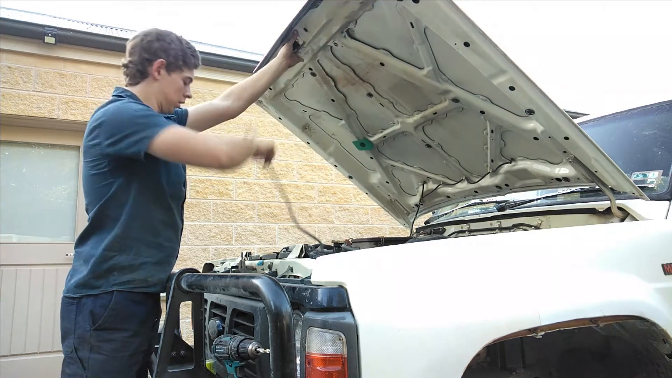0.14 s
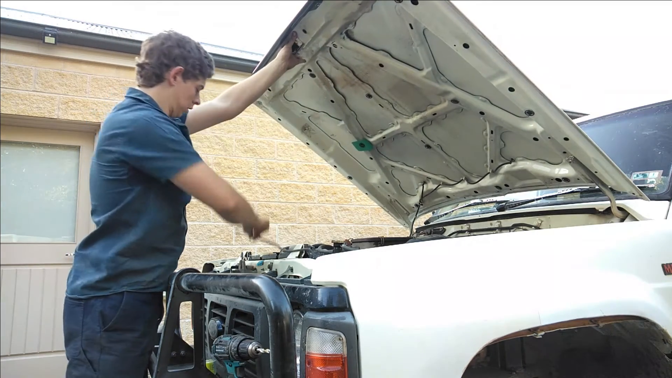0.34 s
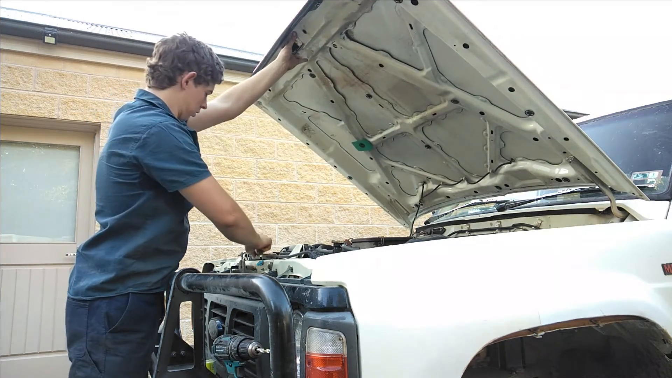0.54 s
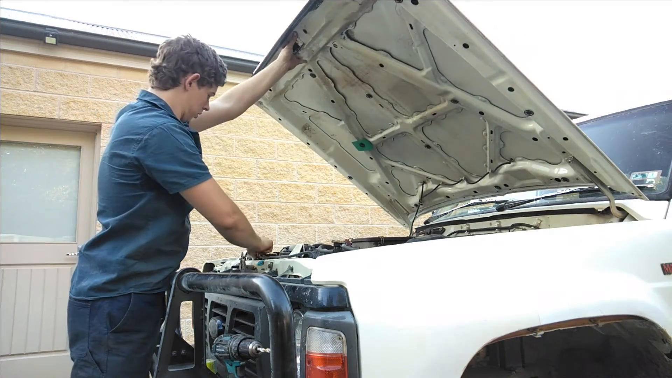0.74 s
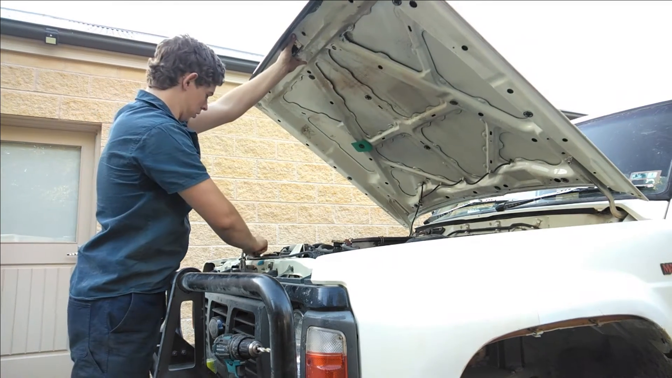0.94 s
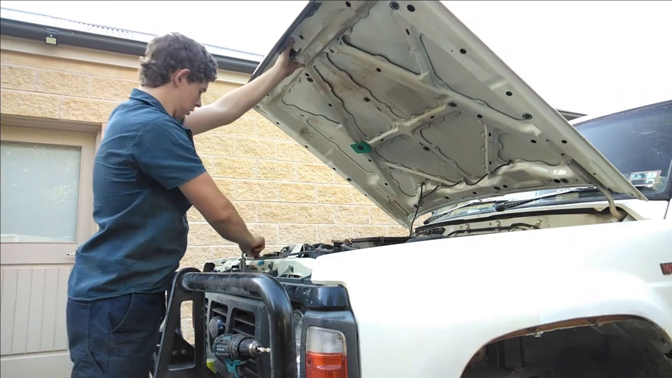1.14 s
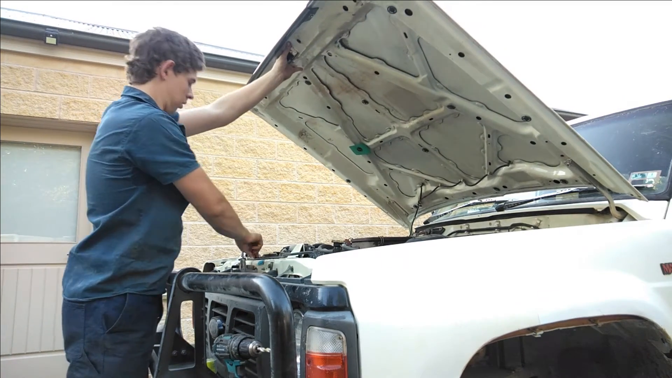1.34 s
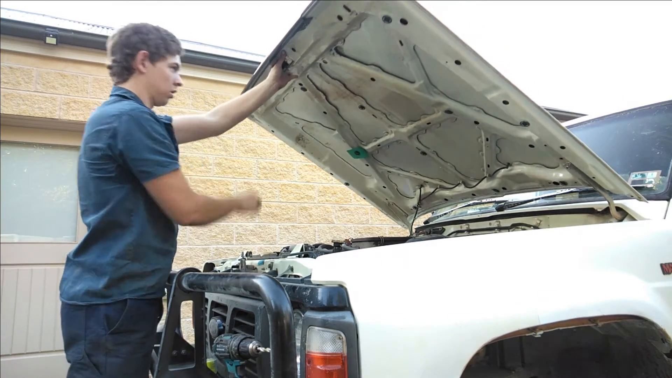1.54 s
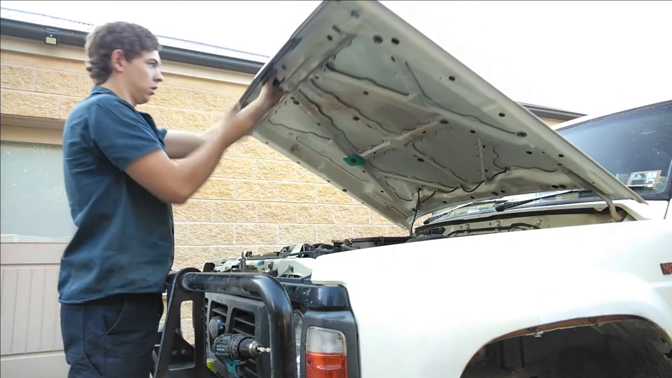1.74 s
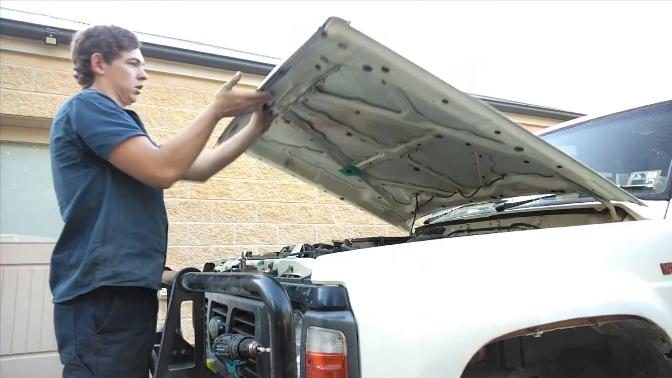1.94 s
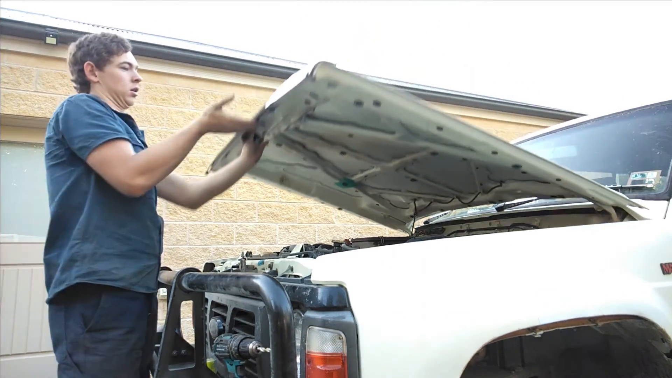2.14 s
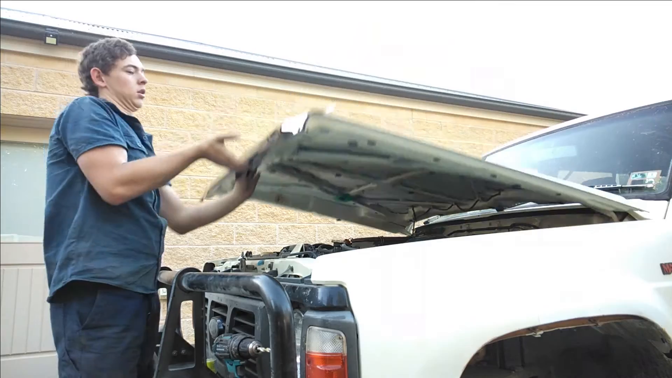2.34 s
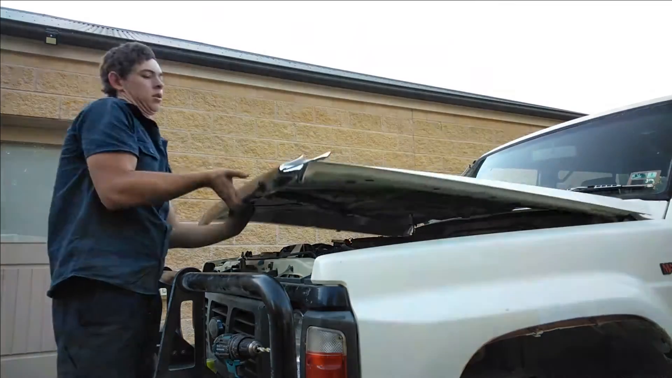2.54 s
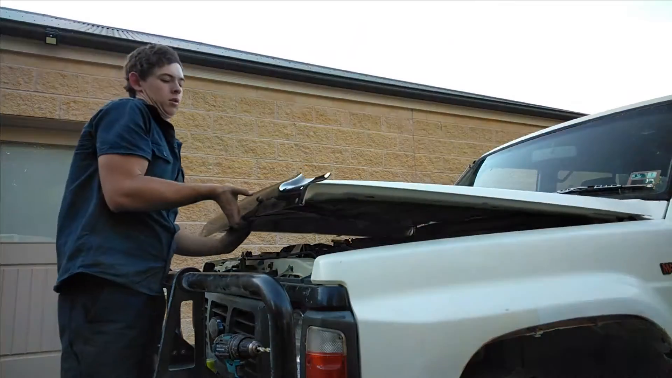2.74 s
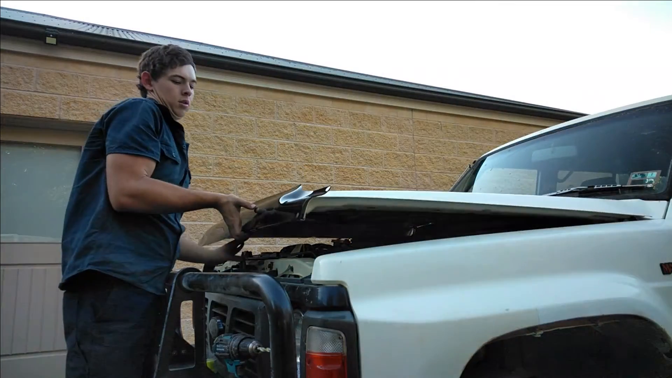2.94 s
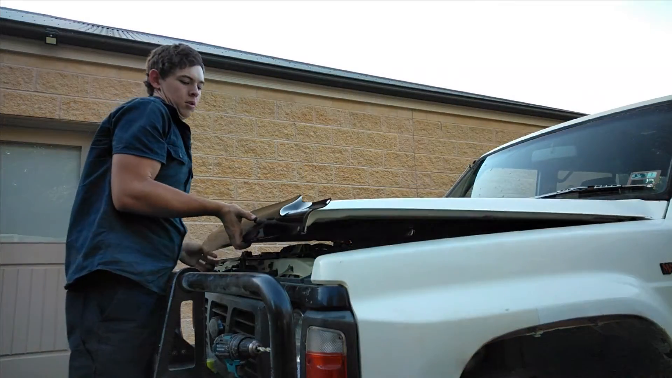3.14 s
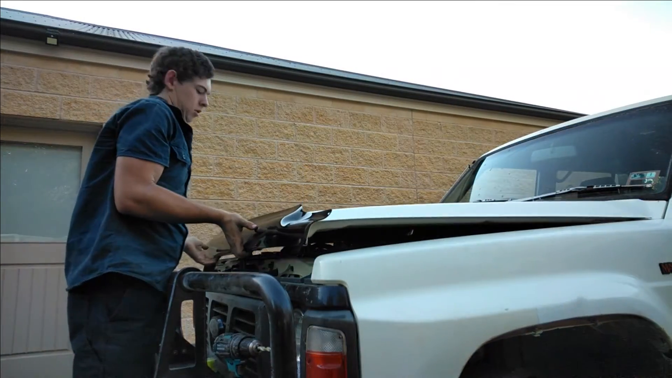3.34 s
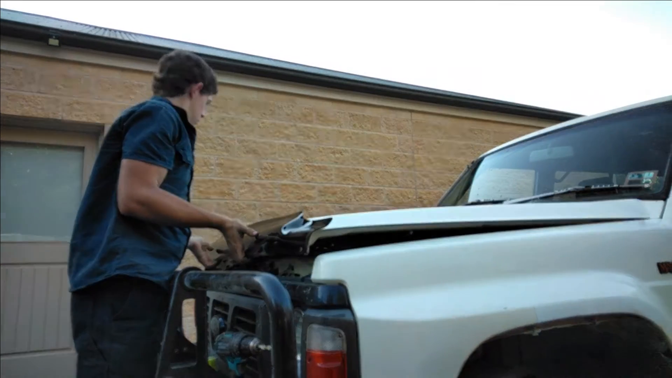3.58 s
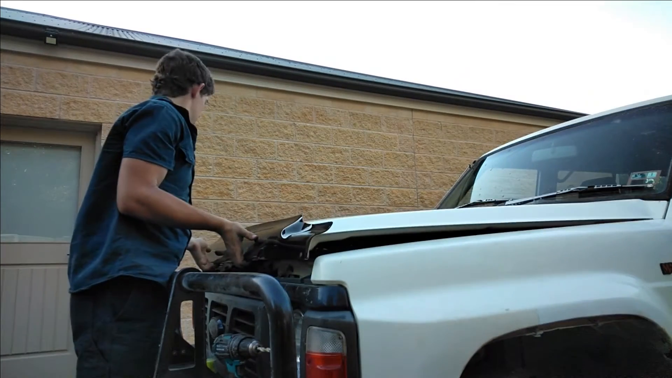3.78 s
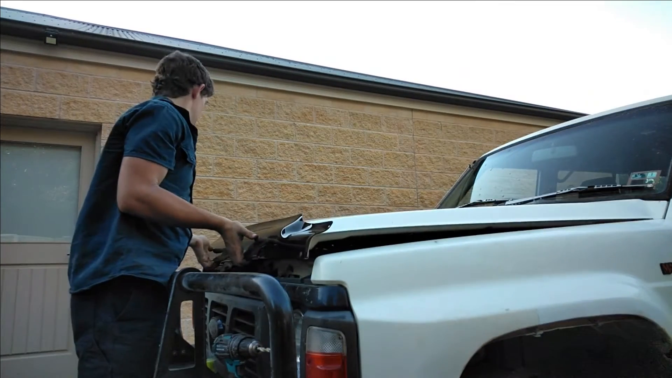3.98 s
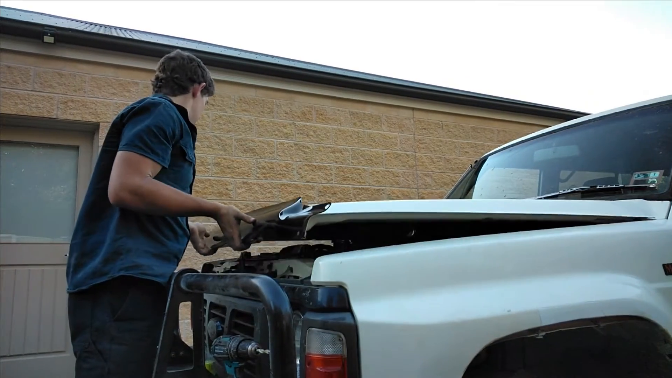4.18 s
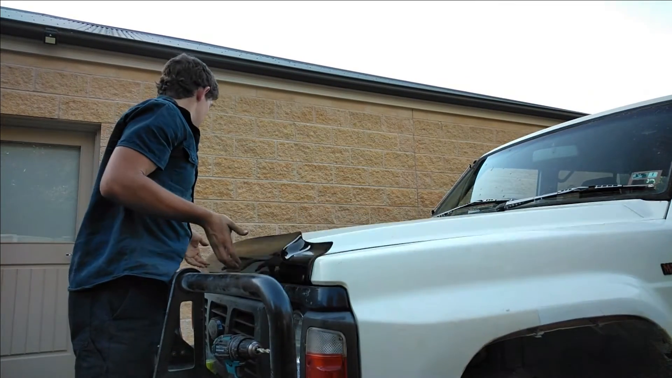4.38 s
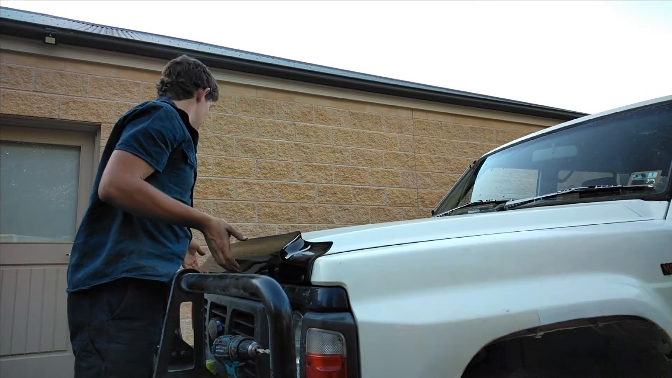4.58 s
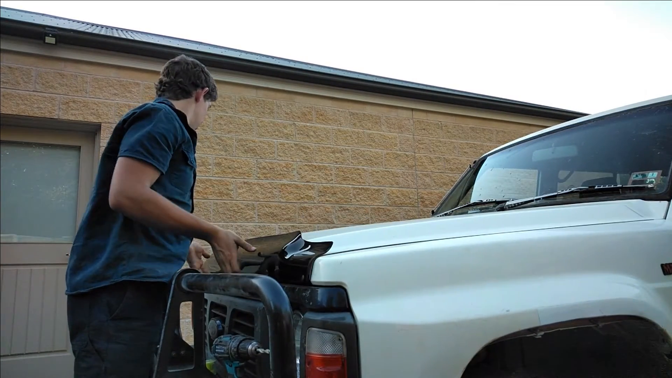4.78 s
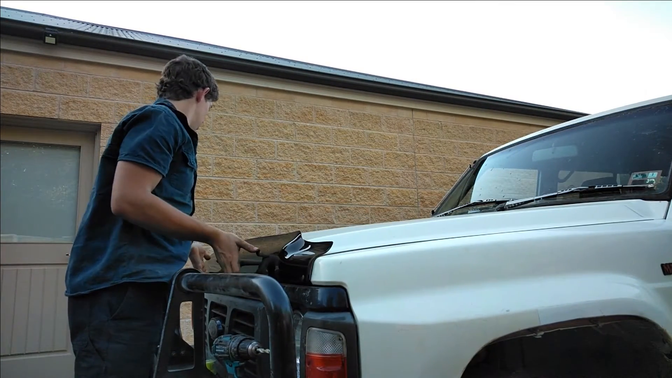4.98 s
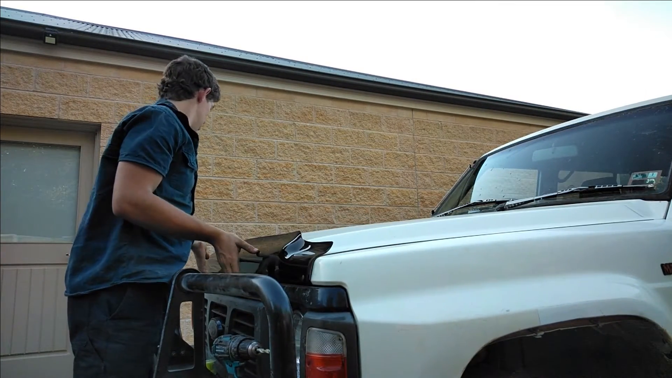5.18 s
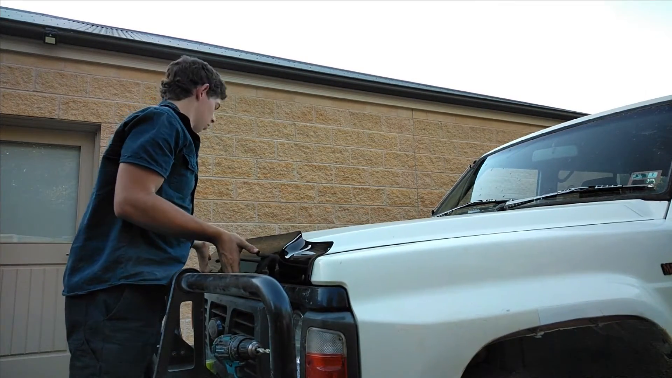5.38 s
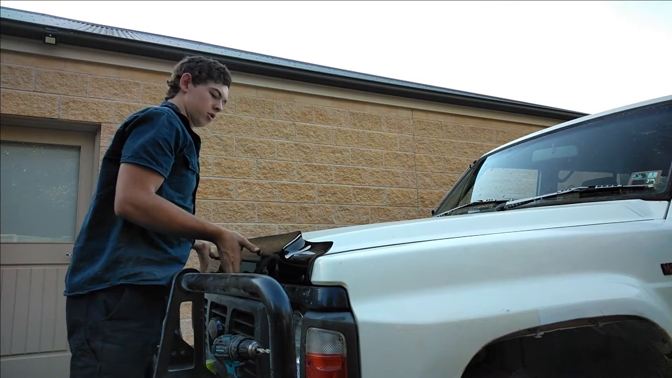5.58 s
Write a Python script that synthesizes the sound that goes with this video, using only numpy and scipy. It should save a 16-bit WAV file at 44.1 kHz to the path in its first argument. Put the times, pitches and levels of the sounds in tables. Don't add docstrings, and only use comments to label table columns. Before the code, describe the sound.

Metal rod clacks into place, a car bonnet knocks on its catch while birds chirp faintly, then a violent steel slam and fading creaks.

```python
import sys
import numpy as np
from scipy import signal
from scipy.io import wavfile
from scipy.ndimage import uniform_filter1d

SR = 44100
rng = np.random.default_rng(int(sys.argv[2]) if len(sys.argv) > 2 else 0)


def store_pcm(level_fs):
    pcm = np.round(np.clip(level_fs, -1, 1) * 32767).astype(np.int16)
    wavfile.write(sys.argv[1], SR, np.atleast_2d(pcm).T)


def volts(x):
    e = np.asarray(x, float) / 20
    return 10 ** e


N = 247401


def column(table, hz, index):
    table = np.array(table)
    return np.interp(np.log(hz), np.log(table[:, 0]), table[:, index])


def rms_one(x):
    return x / np.sqrt(np.mean(x ** 2) + 1e-20)


def drift(rate_hz):
    knots = rng.standard_normal(400)
    return np.interp(np.arange(N) / SR * rate_hz, np.arange(400), knots)


def third_octaves():
    edges_hz = 22 * 2 ** (np.arange(30) / 3)
    for low, high in zip(edges_hz, edges_hz[1:]):
        yield np.sqrt(low * high), signal.butter(2, [low, high], "band", fs=SR, output="sos")


def resonance(x, hz, width_hz):
    r = np.exp(-np.pi * width_hz / SR)
    poles = [1, -2 * r * np.cos(2 * np.pi * hz / SR), r * r]
    return signal.lfilter([(1 - r * r) / 2, 0, (r * r - 1) / 2], poles, x)


def clicks(times_s, sizes):
    train = np.full(N, 1e-18)
    at = np.minimum((np.asarray(times_s) * SR).astype(int), N - 1)
    np.add.at(train, at, sizes)
    return train


def fade(x, t60_s):
    return signal.lfilter([1], [1, -volts(-60 / (t60_s * SR))], x)


def ring(x, hz, t60_s):
    r = volts(-60 / (t60_s * SR))
    w = 2 * np.pi * hz / SR
    return signal.lfilter([0, np.sin(w)], [1, -2 * r * np.cos(w), r * r], x)


def heard(times_s):
    ring_out_s = 1.3
    return slice(int(min(times_s) * SR), int((max(times_s) + ring_out_s) * SR))


def struck(modes, times_s, levels_db):
    chance = rng.uniform(-1, 1, (len(times_s), len(modes)))
    signs = np.sign(np.sin(50 * chance))
    sizes = volts(np.reshape(levels_db, (-1, 1)) + 4 * chance) * signs
    out, span = np.zeros(N), heard(times_s)
    for k, (hz, mode_db, t60_s) in enumerate(modes):
        hits = clicks(times_s, sizes[:, k])[span]
        out[span] += volts(mode_db) * ring(hits, hz, t60_s)
    return out


def bursts(table, bluntness):
    out = np.zeros(N)
    for s, length_s, hz, level_db in table:
        t = np.arange(int(length_s * SR)) / SR
        swell = np.sin(np.pi * t / length_s) ** bluntness
        out[int(s * SR):][:len(t)] += volts(level_db) * swell * np.sin(2 * np.pi * hz * t)
    return out


def voiced(contacts, kind):
    s, peak_db, hard_db, weight_db = np.transpose(contacts)
    edge_db, sizzle_db, sizzle_per_hard_db, tail_db, loss_db_per_s = kind
    edges_db = edge_db + hard_db
    sizzles_db = sizzle_db + sizzle_per_hard_db * hard_db
    tails_db = tail_db - loss_db_per_s * (s - s[0])
    return np.transpose([s, peak_db, weight_db, edges_db, sizzles_db, tails_db])


# f/Hz, colour/dB, first t60/s, tail t60/s
SHEET_BANDS = [(35.3, -11, 0.1, 0.81), (83, 0, 0.31, 0.99), (160, -2, 0.22, 0.95), (312, -4, 0.25, 0.67),
               (560, -1, 0.31, 0.68), (926, -5, 0.19, 0.56), (1640, 5, 0.12, 0.4), (3000, 2, 0.16, 0.46),
               (5300, -2, 0.093, 0.34), (5940, -4.5, 0.13, 0.33), (7850, -4.5, 0.038, 0.24),
               (12400, -3, 0.032, 0.15), (16000, -5, 0.031, .22)]


def sheet(contacts, damping, rise_s, thump_db, grit_db, crack_db):
    s, peak_db, boom_db, edge_db, sizzle_db, tail_db = np.transpose(contacts)
    span, out = heard(s), np.zeros(N)
    roughness_db = grit_db * np.repeat(rng.standard_normal(N // 32 + 1), 32)[:N]
    grit = rms_one(rng.standard_normal((2, N)) * volts(roughness_db))[:, span]
    soft = np.exp(-1 / (rise_s * SR))
    for k, (hz, band) in enumerate(third_octaves()):
        boom_share = np.interp(np.log(hz), np.log([160, 1000]), [1, 0])
        edge_share = np.interp(np.log(hz), np.log([1000, 3500, 9000]), [0, 1, 0])
        sizzle_share = np.interp(np.log(hz), np.log([3500, 9000]), [0, 1])
        level_db = peak_db - 11.5 + column(SHEET_BANDS, hz, index=1)
        level_db += thump_db * np.clip(np.log2(200 / hz), 0, 2)
        level_db += boom_share * boom_db + edge_share * edge_db + sizzle_share * sizzle_db
        first_t60_s = damping * column(SHEET_BANDS, hz, index=2)
        tail_t60_s = damping * column(SHEET_BANDS, hz, index=3)
        first = fade(clicks(s, volts(level_db))[span], first_t60_s)
        tail = fade(clicks(s, volts(level_db + tail_db))[span], tail_t60_s)
        shape = signal.lfilter([1 - soft], [1, -soft], np.hypot(first, tail))
        crack = clicks(s, volts(level_db + crack_db) * np.sqrt(SR / hz))[span]
        per_band = np.sqrt(SR / 2 / (.23 * hz))
        out[span] += signal.sosfilt(band, per_band * (grit[k % 2] * shape + crack))
    return out


def walls(x):
    tail_db, t60_s, first_return_s = -41, .55, .03
    t = np.arange(SR // 2) / SR
    haze = volts(tail_db - 60 * t / t60_s) * rng.standard_normal(len(t)) * (t > first_return_s)
    return signal.fftconvolve(x, haze)[:N]


# f/Hz, density/dB per Hz
YARD_SPECTRUM = [(12, -37), (20, -5.5), (53, -1.5), (99, -15.5), (147, -11.5), (250, -18), (417, -16),
                 (594, -13), (710, -19.5), (968, -18), (4000, -34.5), (5200, -49.5), (8800, -120)]


def yard(patchy_db):
    white = rng.standard_normal((2, N))
    together, out = .4 * drift(3), np.zeros(N)
    for k, (hz, band) in enumerate(third_octaves()):
        swell_db = patchy_db * (together + drift(23))
        gain = volts(column(YARD_SPECTRUM, hz, index=1) + swell_db)
        out += gain * signal.sosfilt(band, white[k % 2])
    return volts(-54.5) * rms_one(out)


# f/Hz, width/Hz, level/dB
ENGINE_DRONES = [(50.52, 3.7, -60.5), (130, 14, -72.5)]


def engines():
    out = np.zeros(N)
    for hz, width_hz, level_db in ENGINE_DRONES:
        narrow = resonance(rng.standard_normal(N), hz, width_hz)
        out += volts(level_db) * rms_one(resonance(narrow, hz, width_hz))
    return out


# t/s, start f/Hz, length/s, first level/dB, second
# level/dB
CHIRP_PAIRS = [
    (2.666, 3700, .043, -46, -47),
    (2.838, 3840, .051, -41, -46),
    (3.218, 3710, .052, -54, -53),
]
# t/s, length/s, f/Hz, sag/Hz, level/dB
LEVEL_PEEPS = [
    (1.72, .03, 1850, 400, -53),
    (1.75, .09, 1480, 30, -53),
    (2.53, .085, 4400, 200, -64),
    (2.71, .07, 2720, 40, -58),
    (2.78, .08, 2650, -100, -55),
    (2.79, .05, 5500, 50, -71),
    (3.14, .04, 2480, 60, -56),
    (3.19, .035, 2460, -30, -58),
    (3.662, .05, 1480, 70, -46),
]


def bird_notes():
    second_delay_s = .0495
    out = []
    for s, hz, length_s, first_db, second_db in CHIRP_PAIRS:
        knee_hz = .875 * hz
        out.append((s, length_s, hz, knee_hz, .62 * hz, first_db))
        out.append((s + second_delay_s, length_s, hz, knee_hz, .8 * hz, second_db))
    for s, length_s, hz, sag_hz, level_db in LEVEL_PEEPS:
        out.append((s, length_s, hz, hz - .75 * sag_hz, hz - sag_hz, level_db))
    return out


def birds():
    out = np.zeros(N)
    for s, length_s, start_hz, knee_hz, end_hz, level_db in bird_notes():
        u = np.linspace(0, 1, int(length_s * SR))
        glide_hz = np.interp(u ** 1.55, [0, .72, 1], [start_hz, knee_hz, end_hz])
        flick_hz = 1.1 * (start_hz - end_hz) * np.exp(-u / .022)
        phase = 2 * np.pi * np.cumsum(glide_hz + flick_hz) / SR
        waver_db = np.interp(u, np.linspace(0, 1, 8), 2.5 * rng.standard_normal(8))
        swell_db = np.interp(u, [0, .08, .75, .88, 1], [-15, 0, -4, -5, -13])
        out[int(s * SR):][:len(u)] += volts(level_db) * volts(waver_db + swell_db) * np.sin(phase)
    return out + walls(out)


# f/Hz, level/dB, t60/s
ROD_MODES = [(885, 4.5, 0.15), (940, -15, 0.22), (1190, -27, 0.24), (1206, -33, 0.15), (1780, -11, 0.077)]
# t/s, level/dB
SLIPS = [
    (.579, -37.5),
    (.587, -38.5),
    (.600, -41),
    (.616, -34),
    (.650, -40),
    (.665, -45),
    (0.682, -46),
    (.708, -42),
    (.735, -53),
    (.815, -49.5),
]
# t/s, length/s, f/Hz, level/dB
SQUEAKS = [
    (.611, 0.022, 885, -25.5),
    (.638, 0.011, 885, -26.5),
    (.592, 0.011, 820, -35),
]


def prop_rod():
    slips_s, slips_db = np.transpose(SLIPS)
    hum = resonance(struck(ROD_MODES, slips_s, slips_db), hz=1050, width_hz=1400)
    return hum + bursts(SQUEAKS, bluntness=0.68)


# t/s, peak level at 500-2000 Hz/dB, hardness/dB, weight/dB
TAPS = [(0.004, -46, -13, -17), (0.238, -43.5, 19, -1.5), (0.282, -26.5, -32, -16.5), (0.311, -60, -8, -13),
        (0.596, -26, -28.5, -26), (0.653, -45, 12, -21), (0.793, -39, -4.5, -5), (1.109, -30, 6.5, -2.5),
        (1.419, -31, 23.5, -25), (1.441, -27, -11, -14.5), (1.995, -44.5, 3, -6), (2.067, -43, 13, -37),
        (2.26, -47.5, 7, -9)]
# t/s, peak level at 500-2000 Hz/dB, hardness/dB, weight/dB
SNAP = [
    (1.170, -10, 1, -20.5),
    (1.177, -19, 0.5, -30.5),
    (1.183, -28.5, -14.5, -20.5),
    (1.193, -8.5, -17.5, -26.5),
]
# edge/dB, sizzle/dB, sizzle per hardness/dB per dB, tail/dB, tail loss/dB per s
TAP_VOICE = (-24, -18, 0.24, -2, 4.5)
SNAP_VOICE = (-1, 2.5, 3.2, -17.5, 7)
BEAM_MODES = [(317, -10, 0.45), (343.7, -3.5, 0.28), (425.7, -3.5, 0.25), (434.3, 1, 0.24),
              (511, -5.5, 0.33), (975, -4.5, 0.26), (1150, -14.5, 0.13), (1340, -4, 0.12),
              (1685, -9, 0.078), (1800, -12, 0.25), (2260, -13, 0.064), (2486, -18, 0.1),
              (2900, -24, 0.082)]


def rod_clip():
    taps, snap = voiced(TAPS, TAP_VOICE), voiced(SNAP, SNAP_VOICE)
    out = sheet(taps, damping=0.7, rise_s=0.0047, thump_db=-8, grit_db=-2.0, crack_db=-24)
    out += sheet(snap, damping=0.99, rise_s=0.00059, thump_db=-9, grit_db=2.0, crack_db=8.5)
    out += struck(BEAM_MODES, taps[:, 0], taps[:, 1] - 18)
    return out + struck(BEAM_MODES, snap[:, 0], snap[:, 1] - 12)


# t/s, peak level at 500-2000 Hz/dB, hardness/dB, weight/dB
CATCH_JUDDERS = [(2.406, -43, -3, -4), (2.447, -28.5, 4.5, -15), (2.5, -34, 0, -15), (2.541, -33, -4, -25),
                 (2.612, -27, 1, -11.5), (2.706, -31, 3, -10.5), (2.786, -33, -10, -10),
                 (2.952, -48, 8, -40), (3.05, -29.5, -5, -10), (3.275, -33.5, 4.5, -20),
                 (3.353, -32.5, 3, -14), (3.592, -25, 4.5, -9.5), (3.838, -21.5, -21, -7),
                 (3.938, -22, 1, -22), (4.004, -27, -3, -25), (4.039, -33.5, -10, -4.5),
                 (4.099, -28, -9.5, -22.5)]
# t/s, peak level at 500-2000 Hz/dB, hardness/dB, weight/dB
PANEL_CREAKS = [(3.19, -51.5, 2.5, -30), (4.314, -29.5, -8, -11.5), (4.345, -33, -16.5, -15),
                (4.699, -37.5, 3, -31), (4.735, -38, -3, -19), (4.822, -37, -5.5, -5),
                (4.909, -43, -6, -12), (4.978, -52, -3, 7), (5.056, -40, -10, -4.5), (5.326, -44.5, 1, 5.5),
                (5.479, -47, -3, -13.5), (5.588, -54, 2, -27)]
# edge/dB, sizzle/dB, sizzle per hardness/dB per dB, tail/dB, tail loss/dB per s
JUDDER_VOICE = (-19, -31.5, 2.6, -7, 0.7)
CREAK_VOICE = (-13, -21, 1.5, 6.5, 5.25)
# f/Hz, level/dB, t60/s
HELD_MODES = [(78, -18, 0.28), (135, -8.5, 0.17), (172, -17, 0.43), (265, -17, .2), (396.5, -9, 0.13),
              (469, -18.5, 0.43), (520.8, -11.5, 0.46), (592, -8, 0.23), (720, -12.5, .12), (960, -15, .14),
              (1242, -7, 0.055)]


def loose_panel():
    judders, creaks = voiced(CATCH_JUDDERS, JUDDER_VOICE), voiced(PANEL_CREAKS, CREAK_VOICE)
    contacts = np.vstack([judders, creaks])
    out = sheet(contacts, damping=0.79, rise_s=.0008, thump_db=-3.5, grit_db=4.0, crack_db=7)
    return out + struck(HELD_MODES, contacts[:, 0], contacts[:, 1] - 6.5)


# t/s, length/s, f/Hz, level/dB
GROANS = [
    (4.215, 0.11, 685, -52),
    (4.24, 0.04, 613, -57),
]


def hinge():
    return bursts(GROANS, bluntness=0.65)


# t/s, f/Hz, level/dB, t60/s
BAY_RESPONSES = [(3.642, 163.5, -48, 0.65), (3.843, 78, -38.5, 0.44), (3.86, 135, -40, 0.15),
                 (3.953, 131.3, -35, 0.26), (4.398, 81.3, -15.5, 0.53), (4.49, 172, -10.5, 0.4),
                 (4.48, 118, -20.5, 0.64), (4.499, 59, -34, 1.1), (4.50, 138.2, -20.5, 0.64),
                 (4.55, 23.66, -34.5, 2.2), (5.332, 130, -48.5, .4)]


def engine_bay():
    out = np.zeros(N)
    for s, hz, level_db, t60_s in BAY_RESPONSES:
        half_cycle = int(SR / hz / 2)
        push = uniform_filter1d(clicks([s], volts(level_db + 9)), size=half_cycle)
        out += ring(push, hz, t60_s)
    return out


# t/s, length/s, f/Hz, level/dB
LATCH_CHATTER = [
    (4.3822, 0.0058, 1150, 7.5),
    (4.3822, .006, 1560, -8),
    (4.419, 0.0064, 1180, -1),
    (4.43, .008, 620, -17),
    (4.444, 0.0047, 620, 1),
    (4.458, 0.024, 150, 0.5),
]


def latch():
    return bursts(LATCH_CHATTER, bluntness=0.47)


# t/s, peak level at 500-2000 Hz/dB, hardness/dB, weight/dB
SLAM_BLOWS = [
    (4.381, 5, -4, -12),
    (4.398, -6.5, 10, -1.5),
    (4.417, -1.5, 2.5, -13.5),
    (4.429, -3, 12.5, -19.5),
    (4.441, -5, 8, -2),
    (4.465, -12.5, -11, 2.5),
    (4.487, -3.5, -8.5, -14.5),
    (4.52, -22, -12, -3),
]
# edge/dB, sizzle/dB, sizzle per hardness/dB per dB, tail/dB, tail loss/dB per s
SLAM_VOICE = (-18.5, -15, 1.03, -6.5, 130.5)
# f/Hz, level/dB, t60/s
SHUT_MODES = [(172, -7, 0.4), (200, -14.5, 0.44), (321, -18, 0.04), (415.4, -28, 0.36), (491.5, -1, 0.12),
              (674, -16.5, 0.29), (604, -41, 0.5), (966, -19, 0.27), (1025, -15, 0.62), (1077, -37, 0.45),
              (1060, -27.5, 0.39), (1300, -36.5, 0.33), (1324, -45.5, 0.47), (1390, -31.5, 0.3)]


def slam():
    blows = voiced(SLAM_BLOWS, SLAM_VOICE)
    crash = sheet(blows, damping=0.88, rise_s=0.0027, thump_db=-2.5, grit_db=1.0, crack_db=-13.5)
    echo = volts(-10) * walls(signal.lfilter([1, -1], [1, -.7], crash))
    modes = struck(SHUT_MODES, blows[1:, 0], blows[1:, 1] - 9)
    return crash + echo + modes


def bonnet():
    return loose_panel() + hinge() + engine_bay() + latch() + slam()


def scene():
    background = yard(patchy_db=1.2) + engines() + birds()
    return (background + prop_rod() + rod_clip() + bonnet())[None]


def band_limit(x):
    return signal.sosfilt(signal.butter(12, 16820, fs=SR, output="sos"), x)


# f/Hz, width/Hz, gain/dB
PORT_RESONANCES = [(6500, 600, 13), (15500, 1200, 16.5)]


def record(dry):
    x = dry[0]
    for hz, width_hz, gain_db in PORT_RESONANCES:
        x = x + (volts(gain_db) - 1) * resonance(x, hz, width_hz)
    x = x + volts(-59.5) * rng.standard_normal(N)
    level_db = 10 * np.log10(uniform_filter1d(x ** 2, size=6000) + 1e-12)
    recovery_db = 8.56 * np.arange(N) / SR
    excess_db = 0.51 * np.maximum(level_db + 22.0, 0)
    duck_db = np.maximum.accumulate(excess_db + recovery_db) - recovery_db
    duck_db = signal.lfilter([.001], [1, -.999], duck_db)
    x = signal.sosfilt(signal.ellip(10, .5, 45, 15950, fs=SR, output="sos"), x)
    x = np.clip(x * volts(-duck_db), -.98, .98)
    return band_limit(x[None])


dry = scene()
out = record(dry)
store_pcm(out)
```